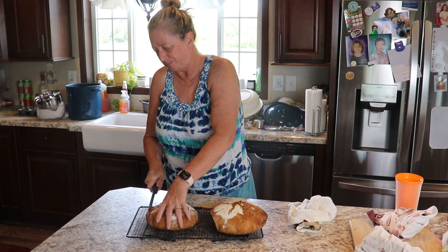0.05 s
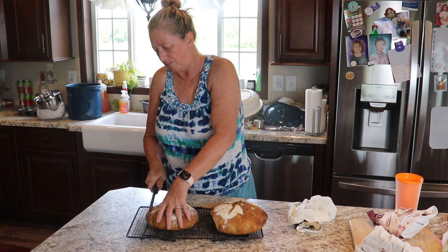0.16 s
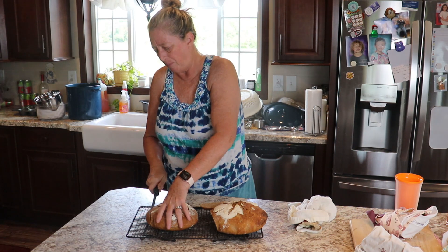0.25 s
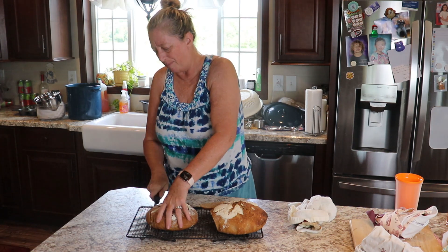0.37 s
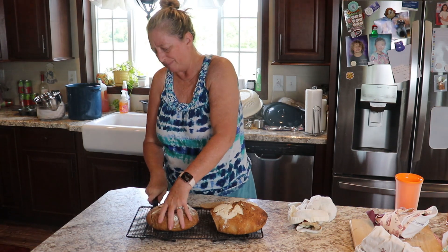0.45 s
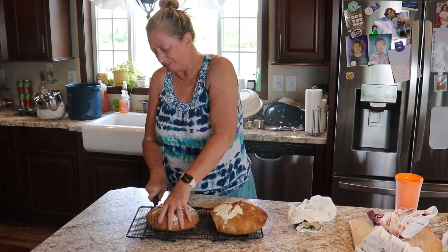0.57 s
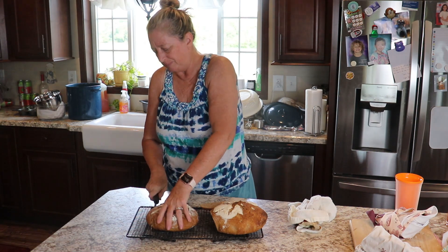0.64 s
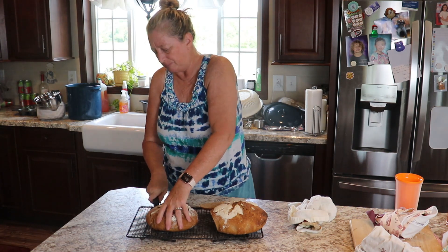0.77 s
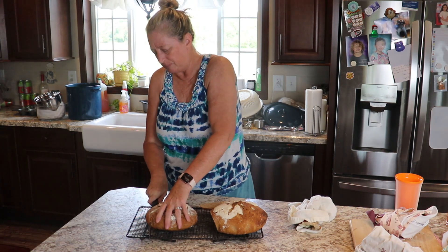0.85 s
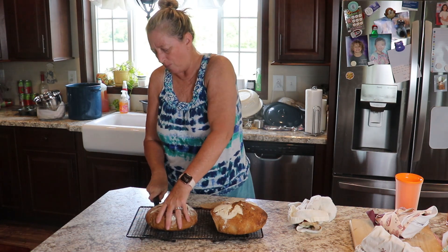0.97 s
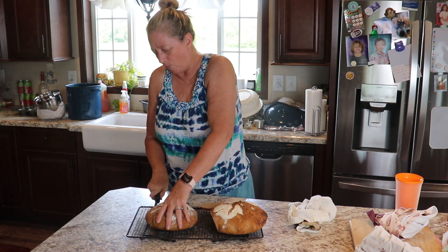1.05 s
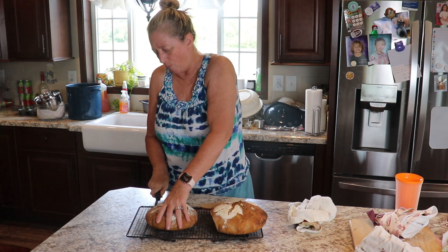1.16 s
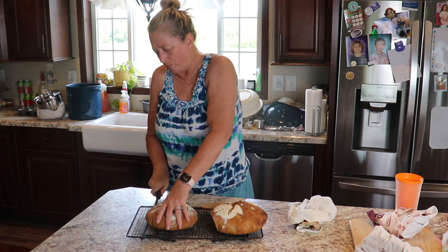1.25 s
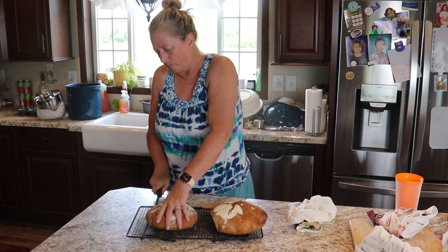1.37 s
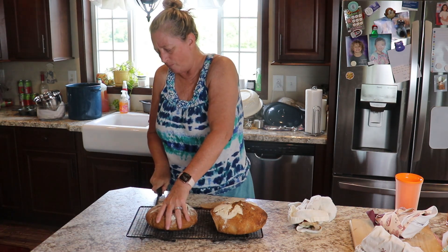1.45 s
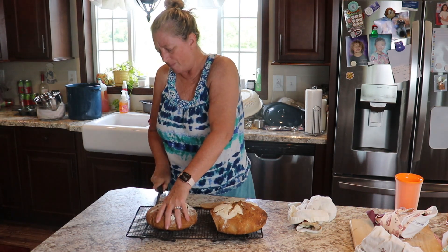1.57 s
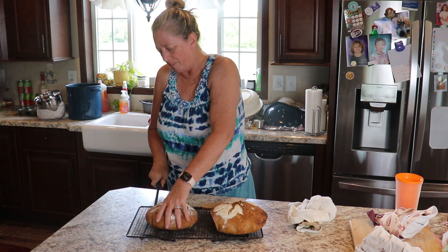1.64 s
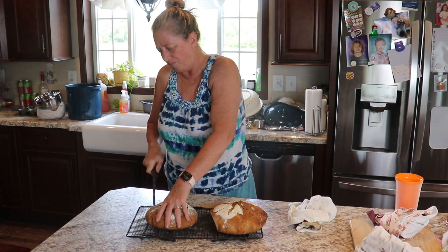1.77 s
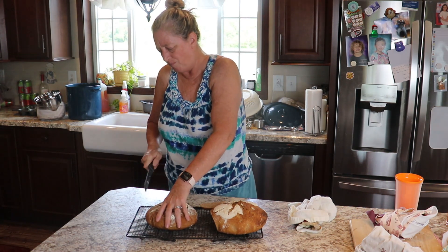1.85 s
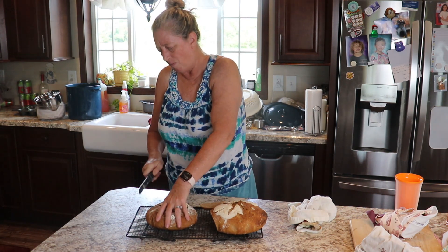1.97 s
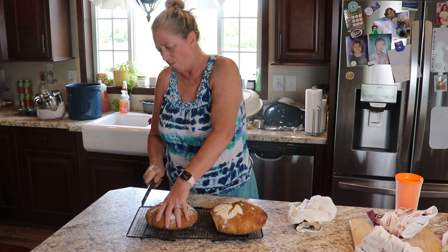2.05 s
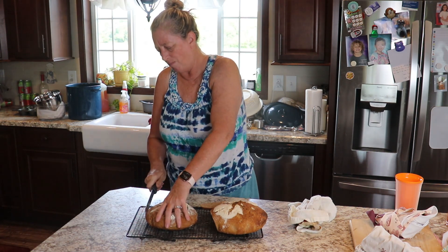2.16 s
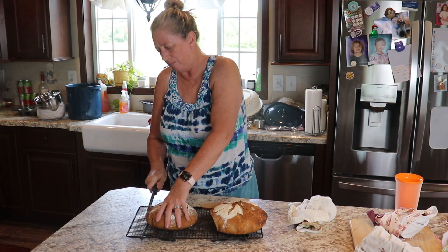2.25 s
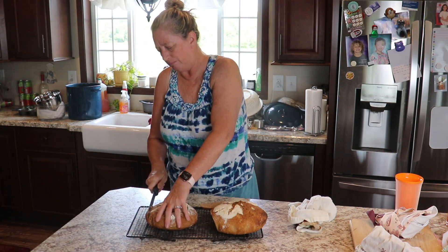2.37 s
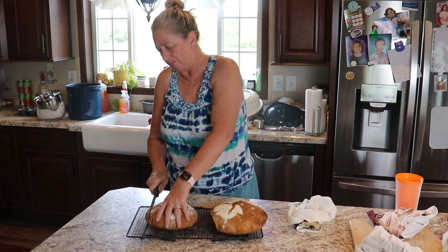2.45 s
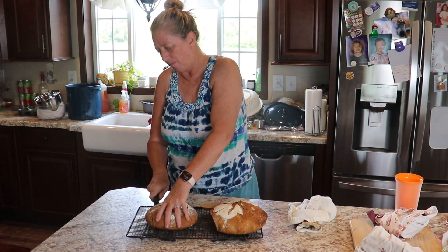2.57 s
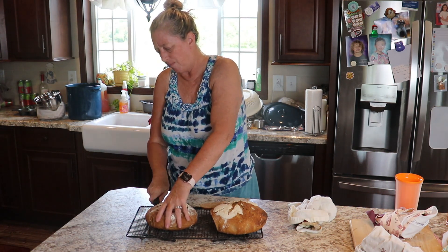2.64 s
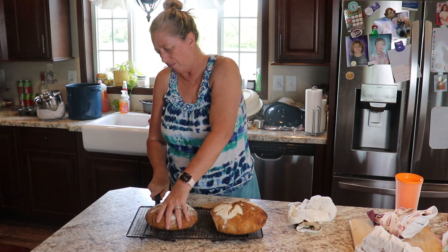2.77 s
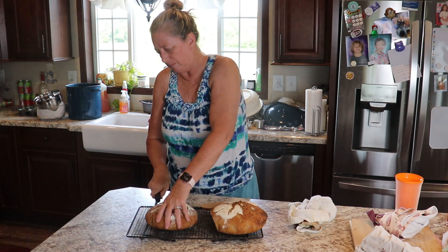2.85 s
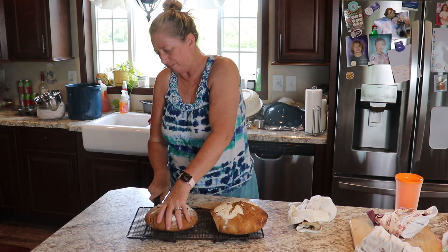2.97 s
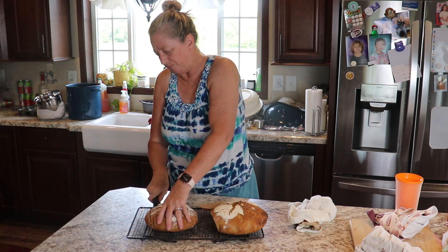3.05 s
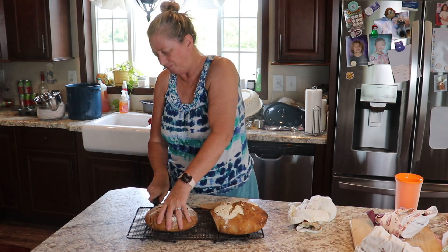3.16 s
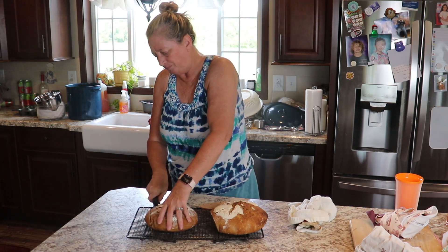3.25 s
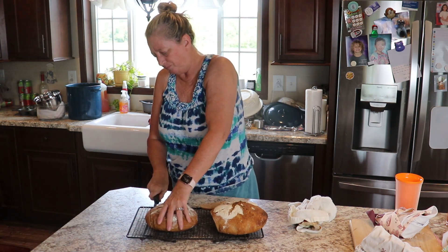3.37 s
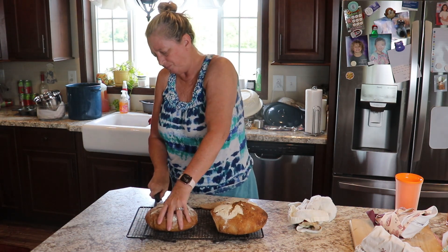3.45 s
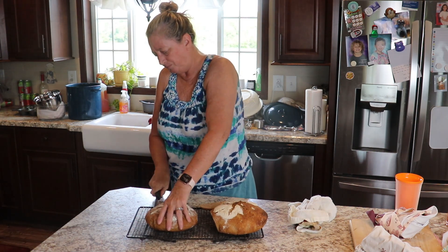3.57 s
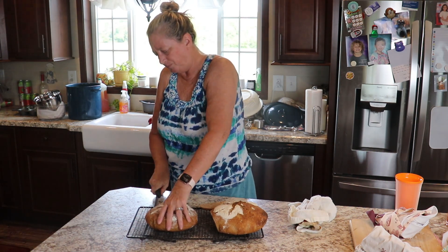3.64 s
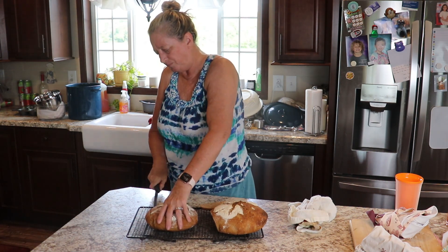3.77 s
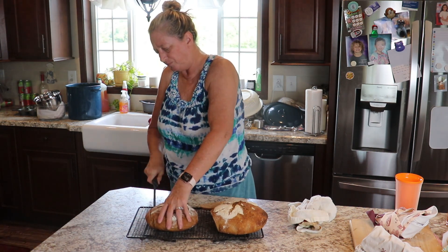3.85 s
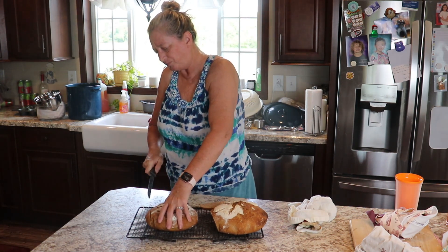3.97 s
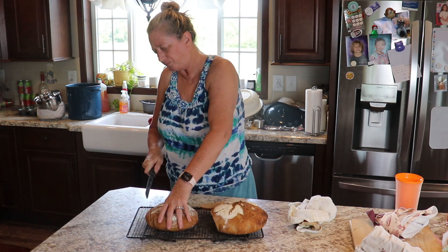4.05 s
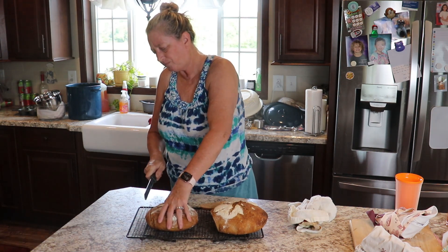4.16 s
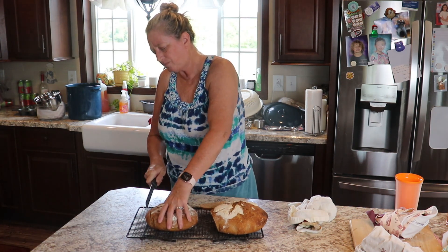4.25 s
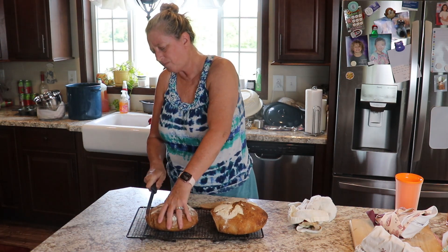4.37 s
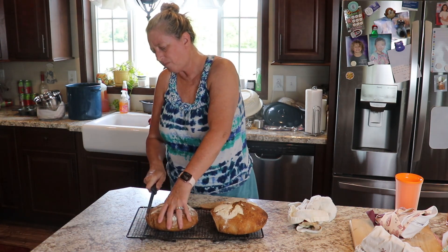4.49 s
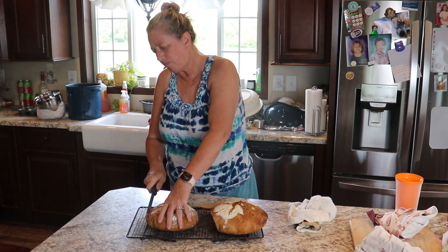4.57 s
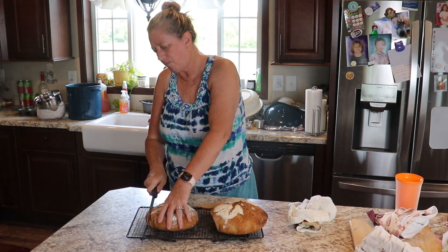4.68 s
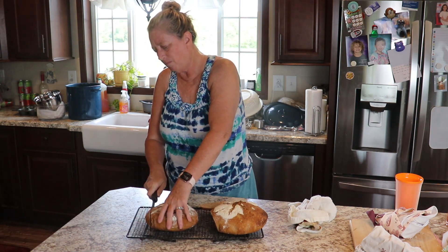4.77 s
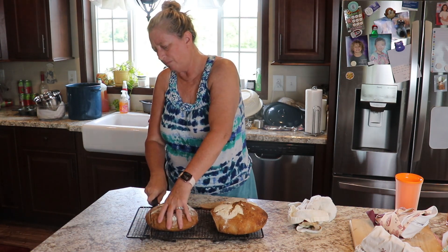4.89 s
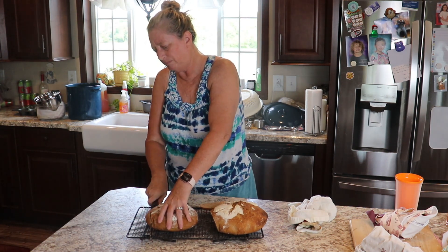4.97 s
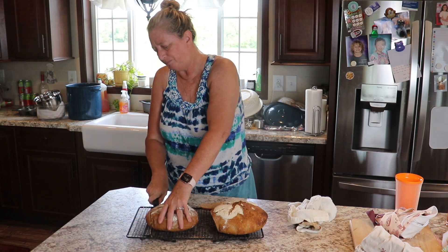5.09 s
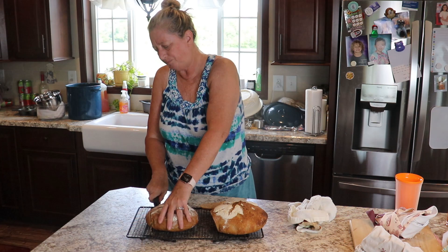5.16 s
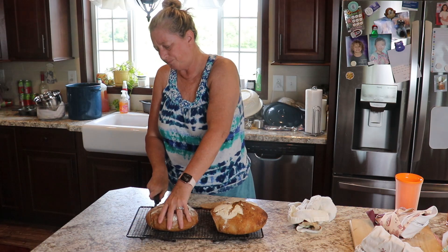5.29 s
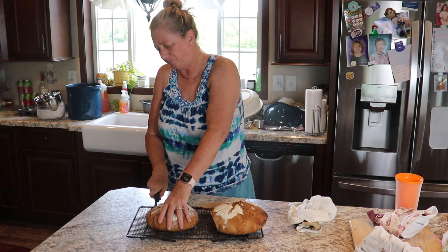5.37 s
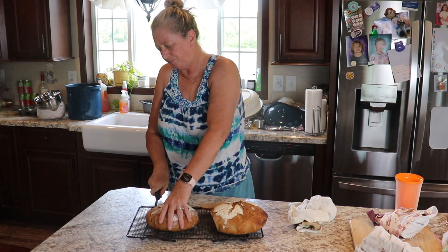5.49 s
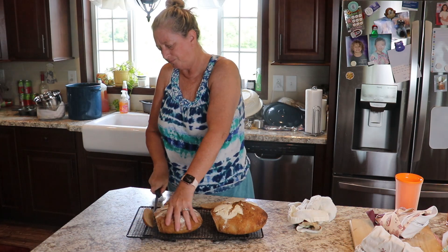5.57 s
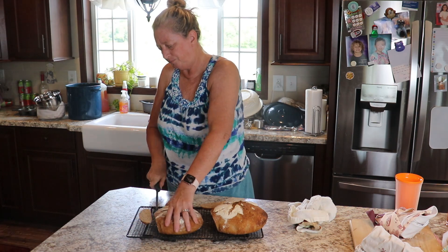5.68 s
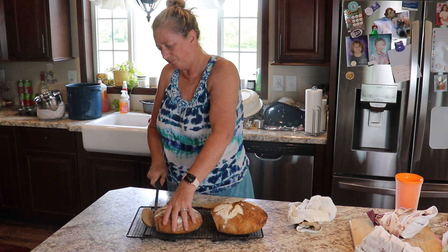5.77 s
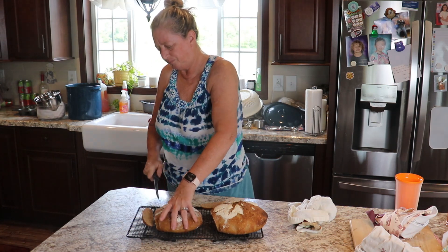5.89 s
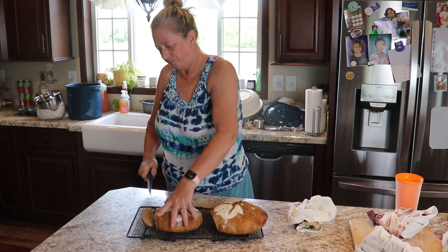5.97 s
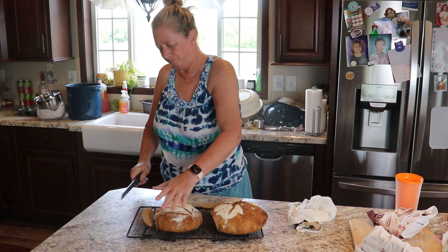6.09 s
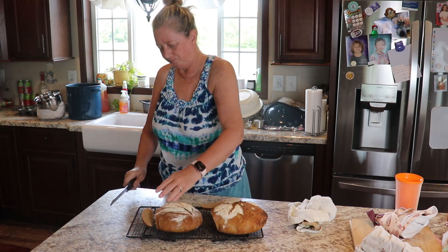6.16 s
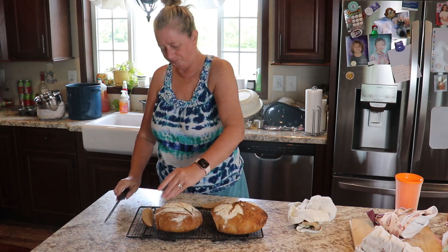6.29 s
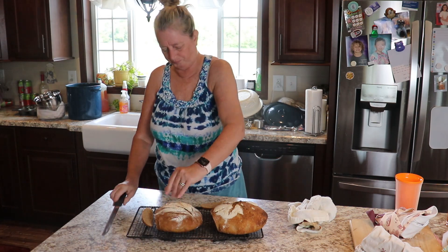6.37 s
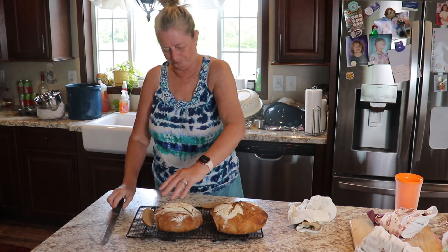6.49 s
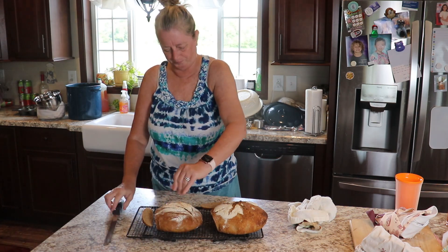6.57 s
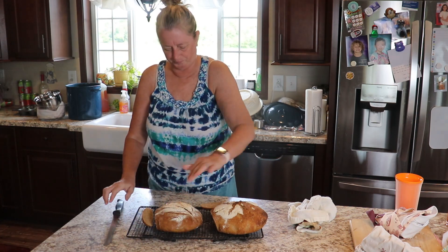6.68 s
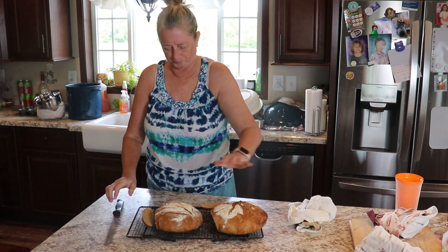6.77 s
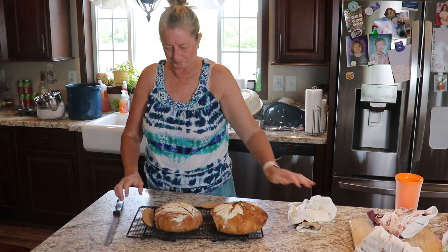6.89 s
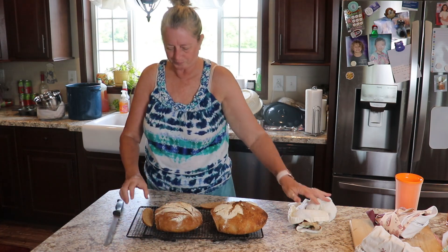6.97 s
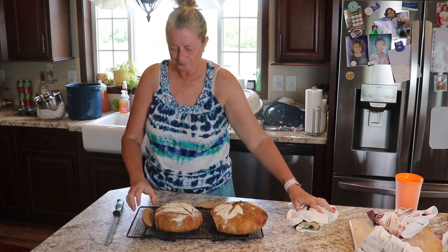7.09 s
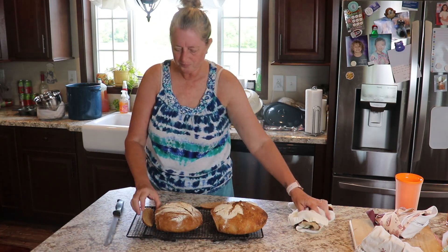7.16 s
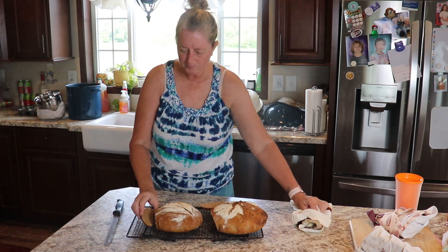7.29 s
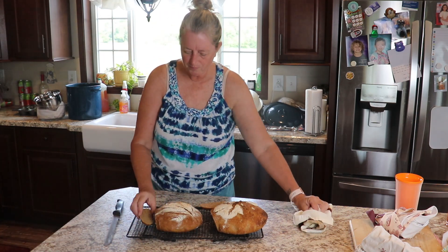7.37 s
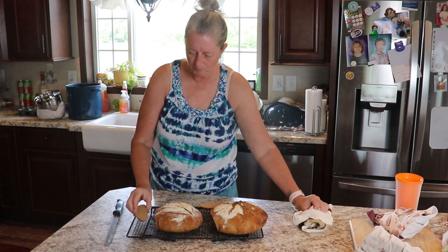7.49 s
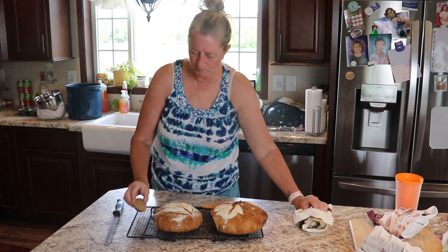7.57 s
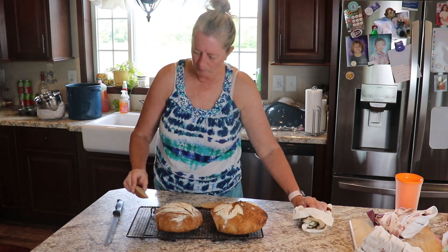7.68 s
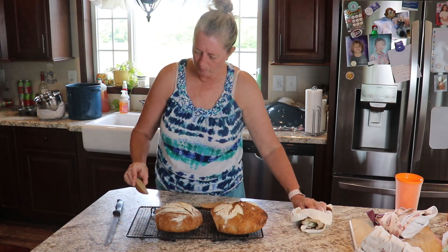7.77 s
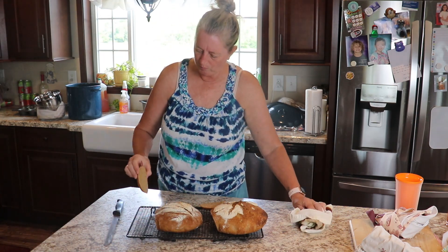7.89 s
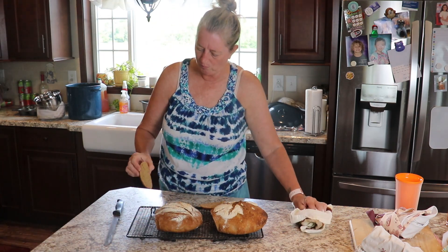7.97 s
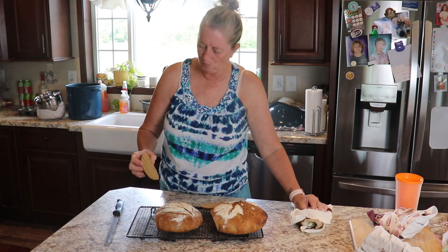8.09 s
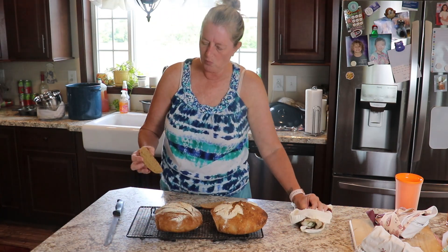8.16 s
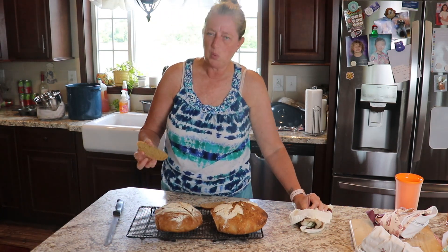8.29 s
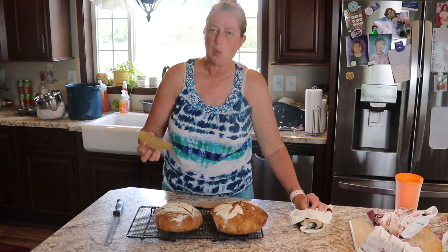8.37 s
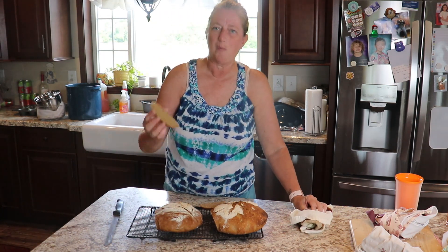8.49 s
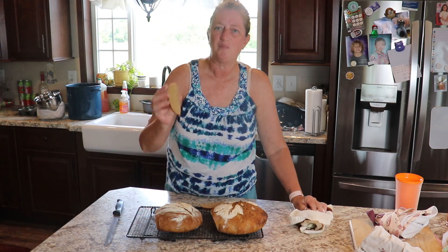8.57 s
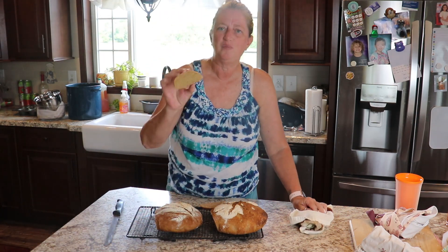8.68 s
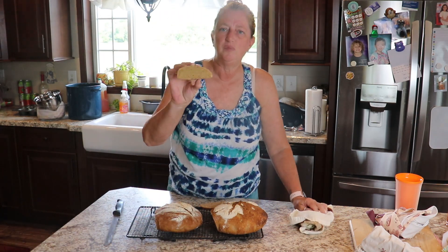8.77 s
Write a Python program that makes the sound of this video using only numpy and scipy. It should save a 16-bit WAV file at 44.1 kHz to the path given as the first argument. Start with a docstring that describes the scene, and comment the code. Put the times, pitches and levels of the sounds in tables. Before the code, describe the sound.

Crunchy, dry bread sawing with snapping crust, a knife set down with loud metallic clatter, soft bumps and a tiny lip smack over faint fridge hum.

```python
"""A serrated knife saws a crusty loaf on a wire rack: filtered trains of tiny clicks excite the loaf's resonances.
The crust snaps and the teeth make the blade sing; strokes shake the stone counter and the blade knocks the rack.
The knife is put down: noise bursts color its steel hits, and damped modes sound its bouncing handle.
Then the loaf bumps the rack and lips smack, both as short noise bursts. A refrigerator hums as wavering sines
over noise for room air; decaying noise gives the kitchen's reverberation, and a limiter ducks the loudest hits."""
import sys
import numpy as np
from scipy import signal
from scipy.fft import rfft, irfft, next_fast_len
from scipy.io import wavfile
from scipy.ndimage import uniform_filter1d

SR = 44100
rng = np.random.default_rng(int(sys.argv[2]) if len(sys.argv) > 2 else 0)


def put_to_file(sound):
    """Save the sound as 16-bit audio at rate SR, in the file named by the first command-line argument."""
    columns = np.atleast_2d(sound).T  # one column per channel
    safe = np.clip(columns, -1, 1)
    whole_steps = np.round(safe * 32767)
    wavfile.write(sys.argv[1], SR, whole_steps.astype(np.int16))


N = 389403
TIME = np.arange(N) / SR  # s

# All levels are those of the sources, ahead of the stereo lean and the limiter.
# Refrigerator partials: pitch_hz, level_db (rms)
HUM_PARTIALS = [(53.8, -52), (118.4, -53), (177.6, -56)]
# Spectrum of room air and hiss: frequency_hz, density_db (relative, per Hz)
AIR_SPECTRUM = [(20, -50), (35, -8), (53, -9.5), (90, -6), (146, -11.5), (204, -9), (640, -15.5),
                (1220, -18.5), (2130, -20), (2820, -20), (5000, -23), (10200, -30.5), (16000, -35)]
AIR_DB = -40  # rms
# Reverberation time of the kitchen: frequency_hz, t60_s
REVERBERATION = [(100, 0.4), (300, 0.56), (1000, 0.68), (3500, 0.38), (8000, 0.49), (15000, 0.15)]
# Left-right correlation of diffuse sound: frequency_hz, correlation (no unit)
DIFFUSE_CORRELATION = [(60, 0.82), (250, 0.84), (500, 0.68), (1000, 0.41), (2000, 0.12), (4000, 0.034),
                       (12000, 0.083)]
# Left-right level difference of direct sound: frequency_hz, difference_db
STEREO_LEAN = [(60, 1), (200, -1), (1100, 2), (2400, -7.5), (4500, -3.5), (8000, 1), (13000, 0.5)]

# Lips parting: start_s, level_db (rms over 10 ms), decay_s, tilt_db_per_octave
LIP_SMACKS = [(8.304, -26, .0015, 6), (8.319, -32, 0.0068, -3)]
# Spectrum of the smack: frequency_hz, density_db (relative, per Hz)
LIP_SPECTRUM = [(500, -31), (1500, -7.5), (2500, 0.5), (4200, -4.5), (5800, -13), (8000, -8), (10500, -11),
                (13000, -20), (16000, -29)]
# Loaf bumping the rack: start_s, level_db (rms over 10 ms), decay_s, tilt_db_per_octave
RACK_BUMPS = [(7.305, -34, 0.0051, 0), (7.399, -25.5, 0.0044, -2), (7.428, -29.5, 0.0054, -4.5),
              (7.515, -33, 0.014, -4)]
# Spectrum of a bumped rack: frequency_hz, density_db (relative, per Hz)
RACK_SPECTRUM = [(80, -14.5), (170, -6), (230, 3.5), (340, -15.5), (520, -12.5), (700, -6.5), (1100, -14),
                 (2000, -18), (5000, -23), (16000, -32)]
# Blade knocking on the wire rack: start_s, level_db (rms over 10 ms), decay_s, tilt_db_per_octave
WIRE_KNOCKS = [(4.9555, -7.5, 0.003, -1)]
# Spectrum of that knock: frequency_hz, density_db (relative, per Hz)
WIRE_SPECTRUM = [(100, -34), (220, -11), (330, -15.5), (700, -9), (1200, -6), (1800, -12), (2300, -1),
                 (3000, -7.5), (4500, -8.5), (6500, -9), (10000, -16), (16000, -20)]

# Blade breaking through and thudding into the counter: start_s, peak_db
COUNTER_THUDS = [(.69, -33), (3.69, -30), (5.26, -21), (5.62, -30), (5.72, -25)]
# Counter resonances, applied twice in series: frequency_hz, width_hz, gain_db (relative)
COUNTER_RESONANCES = [(56.7, 11.5, 0), (89, 27, -4.5)]
# Spectrum of the shuddering counter: frequency_hz, density_db (relative, per Hz)
COUNTER_SPECTRUM = [(20, -26), (40, -22), (58, -3), (95, -13), (150, -12.5), (250, -17), (600, -60)]
# The arm's weight shakes the counter, following the strokes sluggishly
SHUDDER_DB, SHUDDER_POWER, SHUDDER_LAG_S = -31.5, 0.4, 0.085
# Hand brushing softly over the stone: start_s, length_s, level_db (before sag)
HAND_BRUSHES = [(6.44, 0.056, -39.5)]
# Spectrum of the brushing: frequency_hz, density_db (relative, per Hz)
BRUSH_SPECTRUM = [(500, -24), (3000, -10), (8000, -2), (16000, -7)]

# Handle resonances, applied twice in series: frequency_hz, width_hz, gain_db (relative)
HANDLE_RESONANCES = [(293, 31, -0.5), (730, 690, 7.5), (1080, 340, -0.5), (1540, 550, 0.5), (1910, 190, 5)]
# The handle lands once, then rocks in weakening bounces; levels are peak dB
LANDING_S, LANDING_DB = 6.6545, 22.5
BOUNCE_DB, BOUNCE_GAP_S, BOUNCE_FADE_DB_PER_S, BOUNCE_JITTER_S = -2, .0245, 46, .003
# Steel blade striking stone: start_s, level_db (rms over 10 ms), decay_s, tilt_db_per_octave
STONE_HITS = [(6.5735, -7, 0.0071, 2), (6.612, -11, 0.036, -1.5), (6.689, -6.5, 0.0031, 5),
              (6.752, -3, 0.0018, 7.5), (6.868, -13, 0.0023, 11), (6.895, -25.5, 0.0012, 1),
              (6.933, -9.5, 0.0039, 7.5)]
# Spells of the blade chattering as it settles: start_s, length_s, level_db (before sag)
CHATTER_SPELLS = [(6.585, 0.097, -29), (6.75, 0.079, -22.5), (6.85, 0.086, -31), (6.935, 0.017, -20.5)]
# Spectrum of steel on stone: frequency_hz, density_db (relative, per Hz)
STEEL_SPECTRUM = [(150, -38), (250, -13), (330, -13.5), (788, -1.5), (1100, -4.5), (2360, -4.5),
                  (2850, -3.5), (3770, -3), (4980, -9), (5340, -6.5), (5720, -8.5), (14600, -17),
                  (16000, -11.5)]
# Blade resonances: frequency_hz, width_hz, gain_db
BLADE_RESONANCES = [(2786, 63, 0.5), (4420, 46, -2), (4680, 70, -7), (5260, 46, -3), (6170, 80, -11),
                    (7330, 80, -9), (8550, 60, -13), (9600, 64, -19), (11150, 90, -12)]
# Teeth sliding lightly on hard crust: start_s, length_s, level_db (before sag)
TOOTH_SLIDES = [(2.4, 0.27, -48), (2.815, .06, -44), (4.485, .25, -43), (4.715, 0.032, -31)]
# Single teeth catching, as they drive the blade: start_s, level_db (rms over 10 ms), decay_s, tilt_db_per_octave
TOOTH_CATCHES = [(2.827, -14, .004, 5), (4.622, -15, 0.0026, -7.5), (4.681, -23, 0.0029, -1)]

# Saw strokes through the crust: start_s, length_s, level_db (before sag), crispness_db (treble re level)
SAW_STROKES = [(.005, 0.037, -33.5, -1.5), (0.457, 0.12, -36.5, -0.5), (0.538, .035, -27.5, -5),
               (0.672, 0.11, -34.5, -3.5), (0.828, 0.056, -34.5, 6), (0.886, 0.034, -19, -15),
               (0.94, 0.058, -25.5, 1), (1.057, 0.05, -20, -3), (1.13, 0.053, -24.5, -4),
               (1.225, .13, -31, -13), (1.44, 0.09, -36, -10), (1.533, .12, -33, 1.5),
               (1.809, 0.032, -47, 11.5), (2.615, .14, -42.5, -5), (2.8, 0.061, -21.5, 0),
               (2.968, .11, -34.5, 3), (3.351, 0.12, -41.5, 1.5), (3.442, 0.14, -21.5, -6.5),
               (3.643, .1, -22.5, -1), (3.755, 0.097, -28, 8.5), (3.837, 0.03, -8.5, -2.5),
               (4.565, 0.16, -43.5, 1.5), (4.696, 0.053, -35.5, 1.5), (5.135, 0.043, -20.5, -7.5),
               (5.205, .03, -15.5, 3), (5.24, 0.051, -17, -18), (5.427, 0.18, -25.5, -2),
               (5.565, 0.036, -28.5, 10.5), (5.595, .04, -15, 3), (5.657, .07, -18, 7.5),
               (5.764, 0.029, -23.5, 8), (5.862, .17, -35, -1)]
# Crust giving way, before the loaf resonates: start_s, level_db (rms over 10 ms), decay_s, tilt_db_per_octave
CRUST_SNAPS = [(.657, -25, 0.0077, -2), (.683, -22, 0.01, -3), (.879, -9, 0.0037, -2),
               (.8975, -5, 0.0021, .5), (1.043, -10.5, 0.007, 2), (1.05, -7.5, 0.003, -3),
               (2.789, -33, 0.0055, -3), (2.826, -26, .004, -2), (2.858, -26.5, 0.0023, -6),
               (3.321, -33.5, 0.0078, -9), (3.458, -34, .002, 1), (3.675, -21, .002, -3),
               (3.838, -9, 0.0057, -3.5), (3.851, -11, 0.007, -0.5), (3.901, -16, 0.0028, -3),
               (4.488, -39, 0.0025, -11), (5.147, -19.5, 0.0038, -6), (5.213, -12, 0.0041, -0.5),
               (5.231, -14, 0.0012, -3.5), (5.305, -17.5, 0.0034, -2.5), (5.351, -20, .0015, -2.5),
               (5.423, -21, 0.0025, -1), (5.611, -13.5, 0.0039, -2), (5.705, -12, .0035, 2.5),
               (5.783, -16.5, 0.0037, -4)]
# Spectrum of the rasping crust: frequency_hz, density_db (relative, per Hz)
CRUST_SPECTRUM = [(70, -25), (140, -9), (230, -0.5), (310, -4), (410, -5.5), (650, -2), (1150, -4.5),
                  (2100, -5.5), (2750, -12.5), (3900, -10.5), (4700, -14), (6000, -17), (10800, -24.5),
                  (16000, -26)]
# Spectrum of a snap: frequency_hz, density_db (relative, per Hz)
SNAP_SPECTRUM = [(70, -44), (140, -14), (260, -8.5), (420, -13.5), (800, -7), (1500, -5), (2300, -3),
                 (3900, -5.5), (4700, -11.5), (5400, -9.5), (8300, -17), (12500, -20.5), (16000, -27)]
# Loaf resonances: frequency_hz, width_hz, gain_db
LOAF_RESONANCES = [(263, 57, 2), (542, 41, -1), (667, 85, -5), (836, 58, -1), (1055, 26, -6),
                   (1290, 33, -7.5), (1586, 67, -10), (2235, 66, -10), (4070, 320, -8), (5210, 180, -14)]
# Coarse flakes cracking off within a stroke; their level is relative to the treble
FLAKE_DB, FLAKES_PER_S = -7, 130

# Every rubbing movement bites, then slowly loses force
ATTACK_S, SAG_DB_PER_S = 0.019, 26.5
# It runs out with a time constant of this many seconds plus a share of its length
RELEASE_S, RELEASE_SHARE = .012, 0.24
EDGE_HZ = 15950  # upper band limit


def amp(db):
    """Amplitude grows tenfold for every 20 decibels."""
    return 10 ** (np.asarray(db) / 20)


def evened(x):
    """Division by the root mean square gives a signal unit power."""
    return x / np.sqrt(np.mean(x ** 2) + 1e-20)


def read(points, hz):
    """A spectrum is interpolated linearly along a log-frequency axis."""
    frequency_hz, value = np.transpose(points)
    return np.interp(np.log(hz + 1), np.log(frequency_hz + 1), value)


def colour(x, spectrum, tilt_db=0, size=4096):
    """Minimum-phase filtering: a folded cepstrum makes the wanted spectrum causal."""
    hz = np.fft.rfftfreq(size, 1 / SR)
    tilt = tilt_db * np.log2(1 + hz / 400)  # approaches tilt_db per octave well above 400 Hz
    gain_db = np.maximum(read(spectrum, hz), -90) + tilt
    cepstrum = irfft(np.log(amp(gain_db)))
    cepstrum[1:size // 2] *= 2
    cepstrum[size // 2 + 1:] = 0
    impulse_response = irfft(np.exp(rfft(cepstrum)))
    return signal.oaconvolve(x, impulse_response)[:len(x)]


def ring(x, modes):
    """Modal superposition: parallel resonators, each with its gain at its own centre."""
    return sum(amp(db) * signal.lfilter(*signal.iirpeak(hz, hz / width, SR), x)
               for hz, width, db in modes)


def grains(per_s, spread_db):
    """Granular fracture: random clicks of exponentially spread decibels, many faint and few large."""
    sizes = amp(spread_db * np.minimum(rng.exponential(1, N), 4))
    signs = rng.choice([-1, 1], N)
    occurs = rng.random(N) < per_s / SR
    return evened(sizes * signs * occurs)


def strikes(rows, spectrum, size=8192):
    """Impact noise: each contact is a noise burst that builds up quickly and decays exponentially."""
    out, t = np.zeros(N + size), np.arange(size) / SR
    for start, db, decay, tilt_db in rows:
        envelope = (t / decay) ** 0.69 * np.exp(-t / decay)
        burst = colour(rng.standard_normal(size) * envelope, spectrum, tilt_db)
        # rms 1 if the whole energy fell within 10 ms
        burst = evened(burst) * np.sqrt(SR / 100 / size)
        out[round(start * SR):][:size] += amp(db) * burst
    return out[:N]


def blows(rows, modes, size=16384):
    """Impulse response of damped modes, passed twice so that it swells briefly before it decays."""
    knock = ring(ring(signal.unit_impulse(size), modes), modes)
    knock /= abs(knock).max()
    out = np.zeros(N + size)
    for start, db in rows:
        out[round(start * SR):][:size] += amp(db) * knock
    return out[:N]


def gesture(start, length, db):
    """Envelope of friction: a quick attack, a sagging hold and an exponential release."""
    t = np.maximum(TIME - start, 0)
    attack = np.minimum(t / ATTACK_S, 1) ** 2
    release = np.exp(-np.maximum(t - length, 0) / (RELEASE_S + RELEASE_SHARE * length))
    return amp(db - SAG_DB_PER_S * t) * attack * np.maximum(release, 1e-9)


def gestures(rows):
    """Incoherent addition: the gains of successive movements add in power."""
    return np.sqrt(sum(gesture(*row) ** 2 for row in rows))


def diffuse(pair):
    """Diffuse-field coherence: mixing independent signals gives a correlation that varies with frequency."""
    a, b = rfft(pair)
    hz = np.fft.rfftfreq(pair.shape[1], 1 / SR)
    same = np.clip(read(DIFFUSE_CORRELATION, hz), -1, 1)
    return irfft([a, same * a + np.sqrt(1 - same ** 2) * b], pair.shape[1])


def background():
    """Steady broadband noise for room air, and refrigerator partials whose phases wander randomly."""
    size = next_fast_len(N)
    noises = [evened(colour(rng.standard_normal(size), AIR_SPECTRUM)) for channel in range(2)]
    air = diffuse(np.array(noises))[:, :N]
    knots = np.arange(0, TIME[-1] + 1, .25)  # s
    hum = np.zeros(N)
    for hz, db in HUM_PARTIALS:
        drift = np.interp(TIME, knots, np.cumsum(rng.normal(0, 0.47, len(knots))))  # rad
        hum += amp(db) * np.sqrt(2) * np.sin(2 * np.pi * hz * TIME + drift)
    return amp(AIR_DB) * air + hum


def kitchen(x, count=3):
    """Reverberation: bands decay at their own rates; random tails crossfade slowly, which smooths its colour."""
    out = np.zeros((2, N))
    for k in range(count):
        hz, t, z = signal.stft(rng.standard_normal((2, SR)), SR, nperseg=256)
        decay = amp(-60 * t / read(REVERBERATION, hz)[:, None])
        tail = signal.istft(z * decay, SR, nperseg=256)[1][:, :SR]
        # silent for 4 ms, then fading in over 6 ms
        tail = diffuse(tail) * np.clip((TIME[:SR] - .004) / .006, 0, 1)
        tail /= np.linalg.norm(tail[0])
        # the squared shares of all tails sum to one
        share = np.sqrt(2 / count) * np.cos(np.pi * (TIME / 2 + k / count))
        out += signal.fftconvolve((share * x)[None], tail, axes=1)[:, :N]
    return out


def lip_smack():
    """Impulsive release: parting lips emit short colored noise bursts."""
    return strikes(LIP_SMACKS, LIP_SPECTRUM)


def rack_bumps():
    """Soft impact: the loaf bumps the rack in short noise bursts of mostly low frequency."""
    return strikes(RACK_BUMPS, RACK_SPECTRUM)


def wire_knock():
    """Hard impact: the blade knocks on the wire in a colored noise burst."""
    return strikes(WIRE_KNOCKS, WIRE_SPECTRUM)


def counter(force):
    """Forced vibration: strokes shake the counter, thuds excite its modes, and a hand rubs it as noise."""
    lagging_force = abs(uniform_filter1d(force, round(SHUDDER_LAG_S * SR)))
    rumble = evened(colour(rng.standard_normal(N), COUNTER_SPECTRUM))
    shudder = amp(SHUDDER_DB) * lagging_force ** SHUDDER_POWER * rumble
    thuds = blows(COUNTER_THUDS, COUNTER_RESONANCES)
    brush = gestures(HAND_BRUSHES) * evened(colour(rng.standard_normal(N), BRUSH_SPECTRUM))
    return shudder + thuds + brush


def handle(count=12):
    """Repeated impact: the hard handle excites its modes on stone in weakening, slightly uneven bounces."""
    after = BOUNCE_GAP_S * np.arange(1, count + 1) + BOUNCE_JITTER_S * rng.standard_normal(count)
    bounces = [(LANDING_S + s, BOUNCE_DB - BOUNCE_FADE_DB_PER_S * s) for s in after]
    return blows([(LANDING_S, LANDING_DB)] + bounces, HANDLE_RESONANCES)


def clatter():
    """Impact excitation: blade hits and chattering clicks drive the upper modes of the steel."""
    clicks = evened(colour(grains(per_s=600, spread_db=2.5), STEEL_SPECTRUM, tilt_db=-4.5))
    steel = strikes(STONE_HITS, STEEL_SPECTRUM) + gestures(CHATTER_SPELLS) * clicks
    upper_modes = [mode for mode in BLADE_RESONANCES if mode[0] > 5000]
    return steel + amp(11) * ring(steel, upper_modes)


def singing():
    """Frictional excitation: teeth that slide and catch on hard crust ring the blade's modes."""
    song = evened(ring(grains(per_s=700, spread_db=4), BLADE_RESONANCES))
    pings = ring(strikes(TOOTH_CATCHES, SNAP_SPECTRUM), BLADE_RESONANCES)
    return gestures(TOOTH_SLIDES) * song + pings


def sawing(force):
    """Brittle fracture: crumbs break in uneven clumps and ring the loaf; hard crust adds treble, flakes, snaps."""
    clumps = amp(2.24 * evened(uniform_filter1d(rng.standard_normal(N), size=260)))
    rasp = colour(grains(per_s=5000, spread_db=2.5) * clumps, CRUST_SPECTRUM)
    rasp = evened(rasp + ring(rasp, LOAF_RESONANCES))
    body = signal.lfilter(*signal.butter(1, 1200, fs=SR), rasp)
    treble = rasp - body
    crisp = gestures([(s, length, db + crisp_db) for s, length, db, crisp_db in SAW_STROKES])
    cracks = evened(colour(grains(per_s=FLAKES_PER_S, spread_db=3), SNAP_SPECTRUM, tilt_db=.5))
    flakes = amp(FLAKE_DB) * crisp * cracks
    snaps = strikes(CRUST_SNAPS, SNAP_SPECTRUM)
    return force * body + crisp * treble + flakes + snaps + ring(snaps, LOAF_RESONANCES)


def scene():
    """Stereo by delay and colour: sources sit a little to the left, so the right hears them later."""
    force = gestures([(s, length, db) for s, length, db, _ in SAW_STROKES])
    bread = sawing(force) + singing() + counter(force) + rack_bumps()
    blade, wire, knocks, lips = clatter(), wire_knock(), handle(), lip_smack()
    near = bread + blade + wire + knocks + lips
    later = signal.lfilter([0, .7, .3], [1], near)  # about 1.3 samples
    left = colour(near, [(hz, db / 2) for hz, db in STEREO_LEAN])
    right = colour(later, [(hz, -db / 2) for hz, db in STEREO_LEAN])
    to_room = amp(-4.0) * bread + amp(-3.5) * blade + amp(-3.5) * wire
    to_room += amp(-14.5) * knocks + amp(-1.5) * lips
    return np.array([left, right]) + kitchen(to_room) + background()


def ducked(x, threshold_db, share, recovery_db, size):
    """Compression: a peak-held power, falling at recovery_db per second, sets the gain by its excess."""
    power_db = 10 * np.log10(abs(uniform_filter1d((x ** 2).mean(0), size)) + 1e-12)
    fall = TIME * recovery_db
    held_db = np.maximum.accumulate(power_db + fall) - fall
    over_db = np.maximum(held_db - threshold_db, 0)
    return x / amp(share * uniform_filter1d(over_db, size))  # share of the excess is removed


def record(dry):
    """Dynamics in series: a fast limiter, a gentle slow gain control, overload and the band limit."""
    x = ducked(dry, threshold_db=-4, share=0.88, recovery_db=293, size=110)
    x = ducked(x, threshold_db=-26.5, share=0.21, recovery_db=8.0, size=900)
    x = np.clip(amp(1.5) * x, -1, 1)
    lowpass = signal.firwin(511, EDGE_HZ, window=("kaiser", 8), fs=SR)
    return signal.oaconvolve(x, lowpass[None], "same")


dry = scene()
out = record(dry)
put_to_file(out)
```